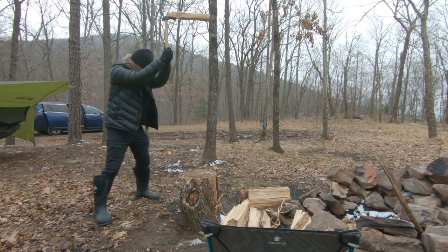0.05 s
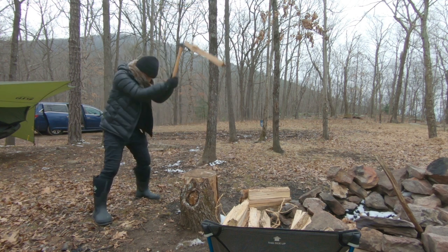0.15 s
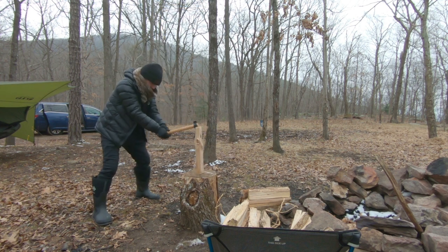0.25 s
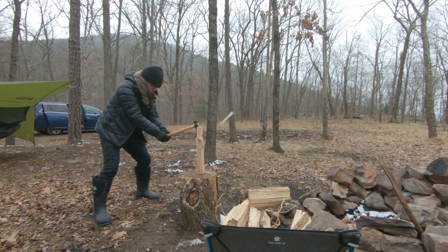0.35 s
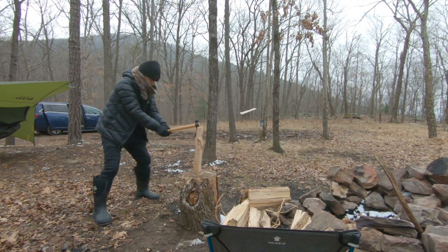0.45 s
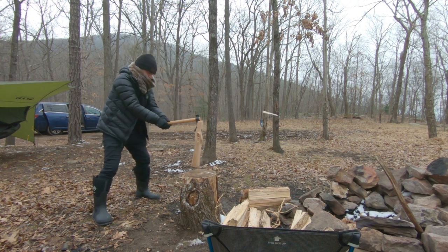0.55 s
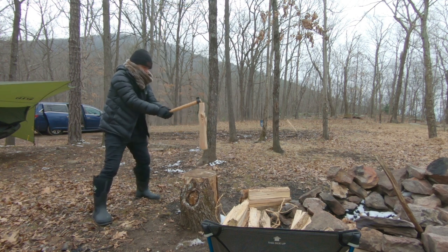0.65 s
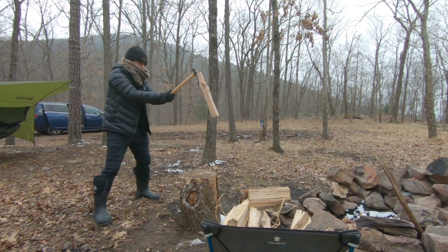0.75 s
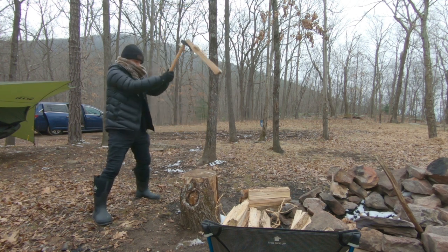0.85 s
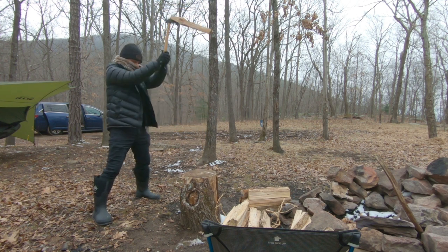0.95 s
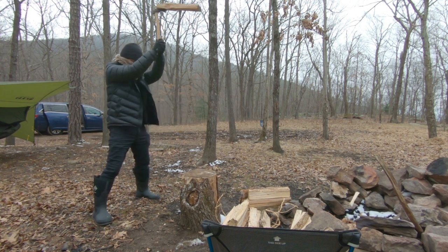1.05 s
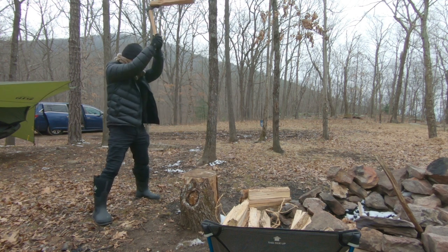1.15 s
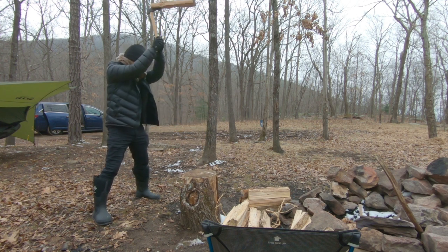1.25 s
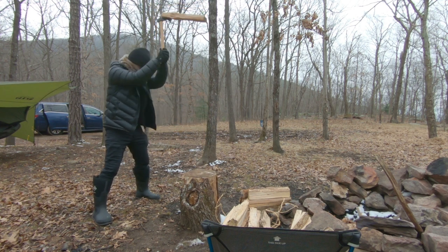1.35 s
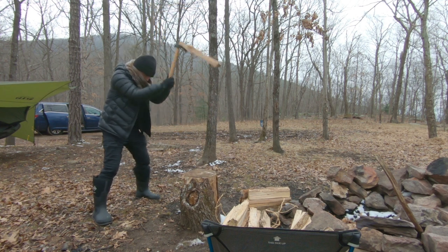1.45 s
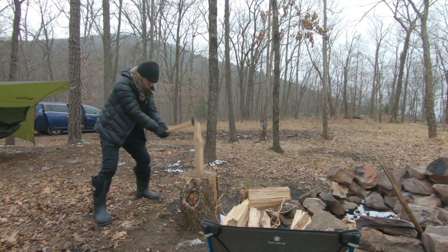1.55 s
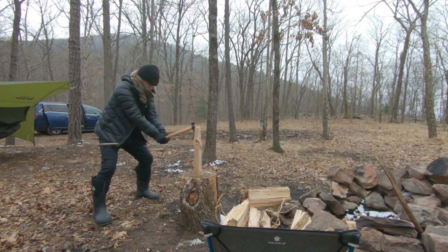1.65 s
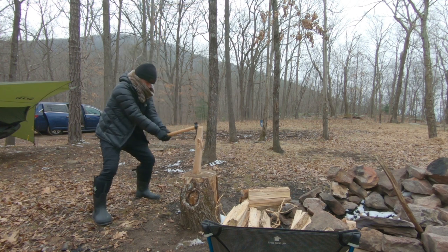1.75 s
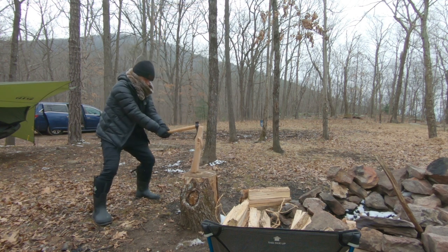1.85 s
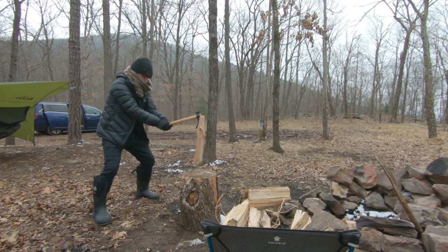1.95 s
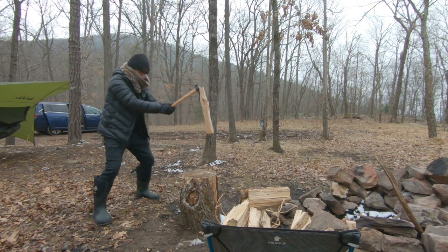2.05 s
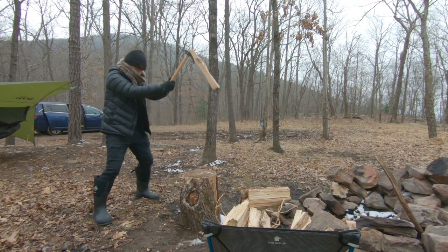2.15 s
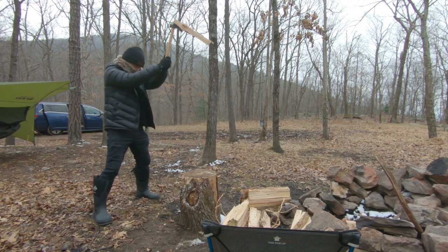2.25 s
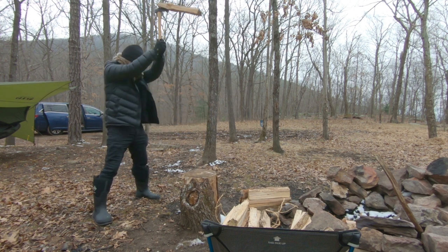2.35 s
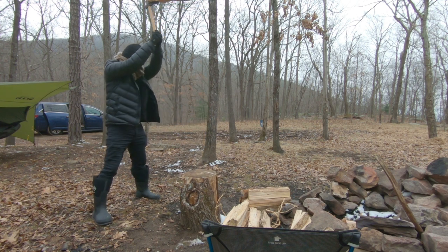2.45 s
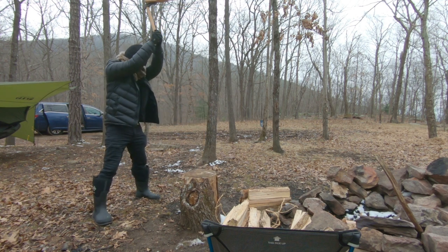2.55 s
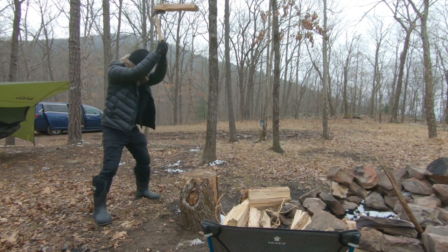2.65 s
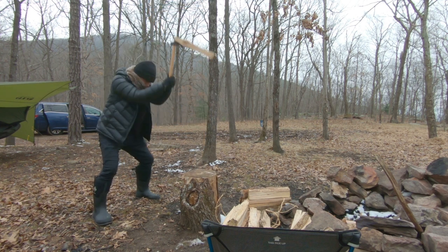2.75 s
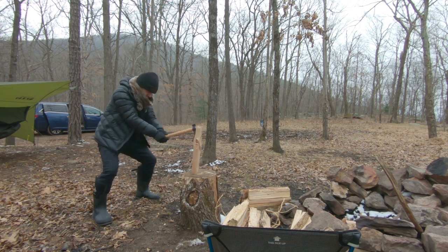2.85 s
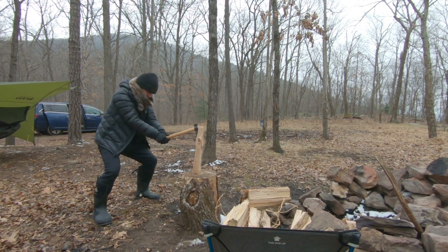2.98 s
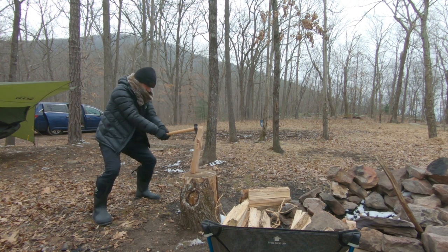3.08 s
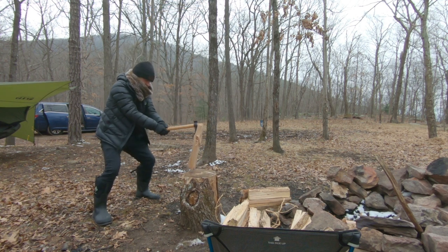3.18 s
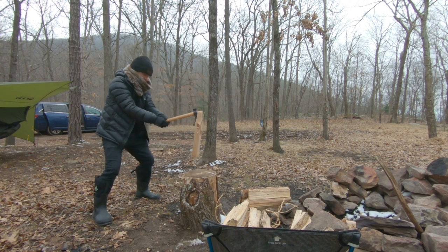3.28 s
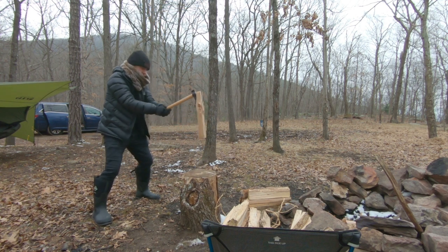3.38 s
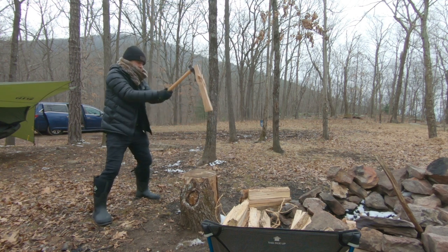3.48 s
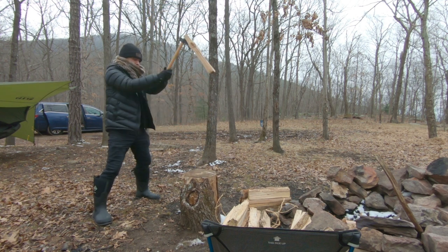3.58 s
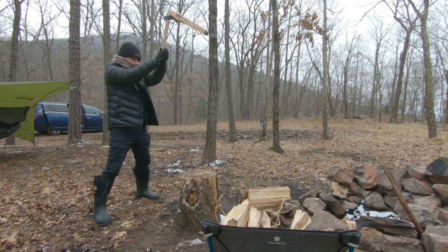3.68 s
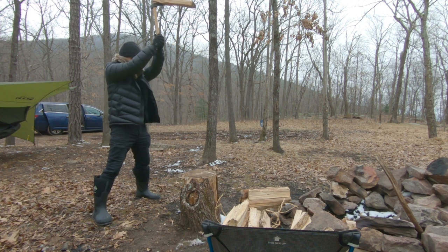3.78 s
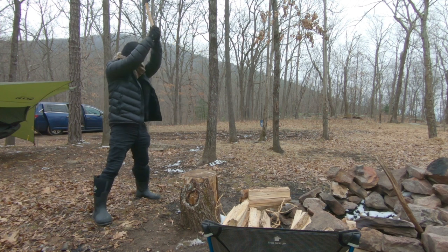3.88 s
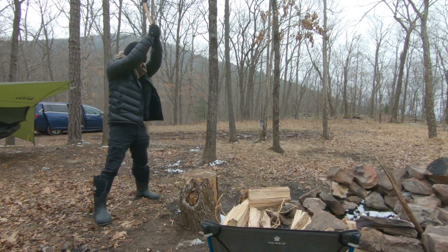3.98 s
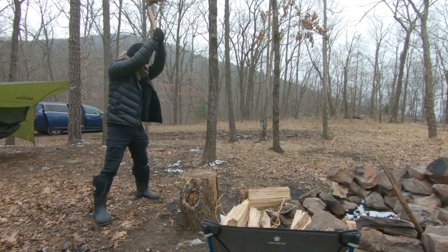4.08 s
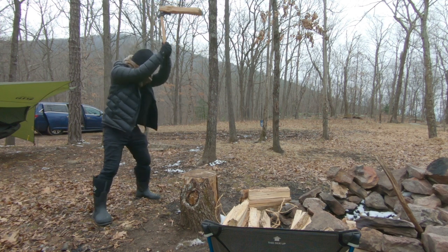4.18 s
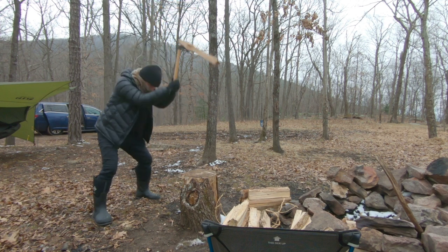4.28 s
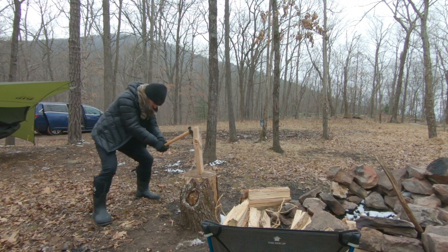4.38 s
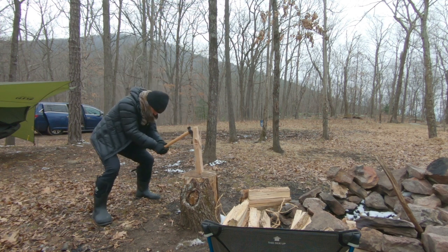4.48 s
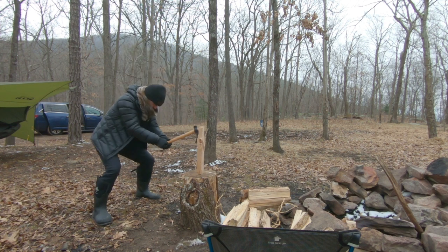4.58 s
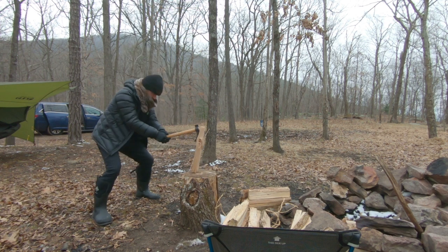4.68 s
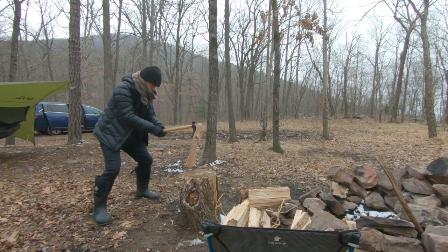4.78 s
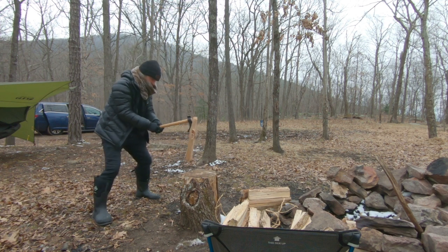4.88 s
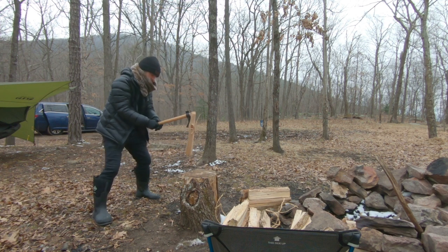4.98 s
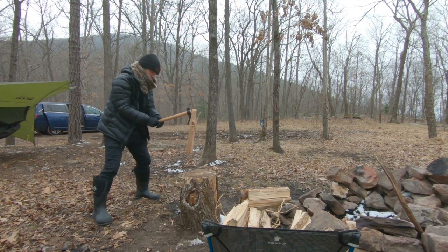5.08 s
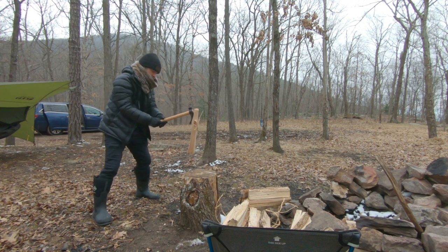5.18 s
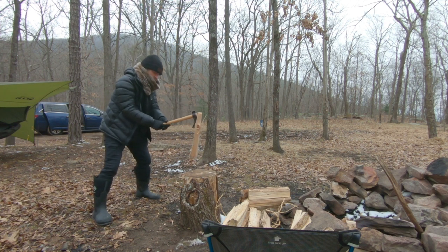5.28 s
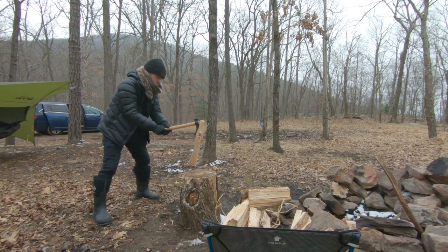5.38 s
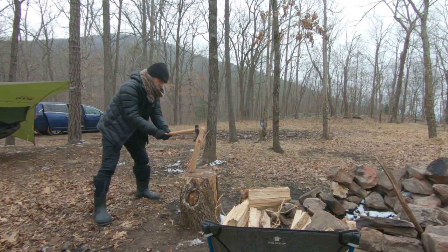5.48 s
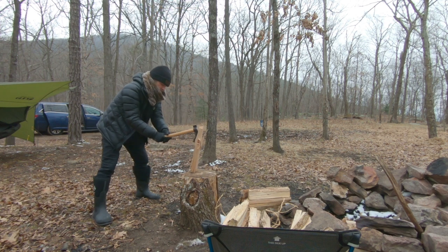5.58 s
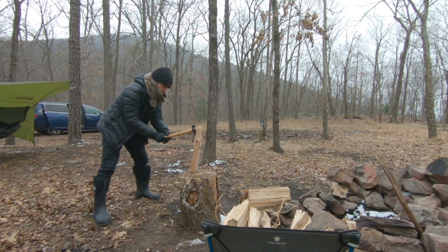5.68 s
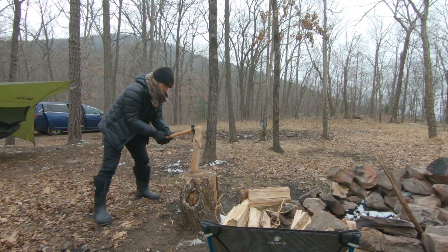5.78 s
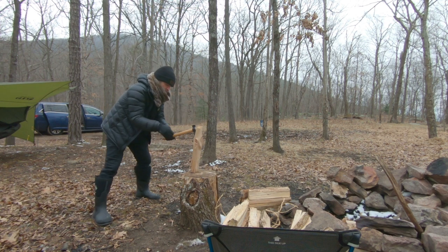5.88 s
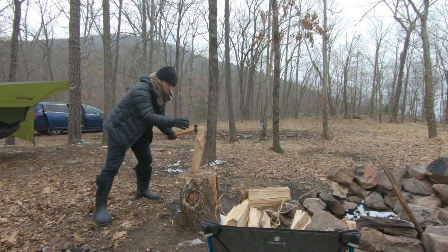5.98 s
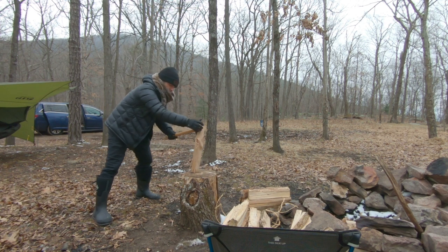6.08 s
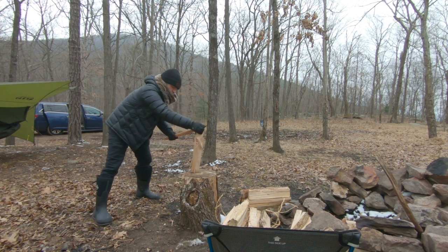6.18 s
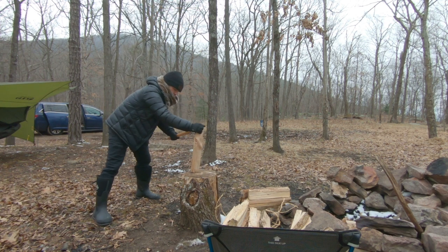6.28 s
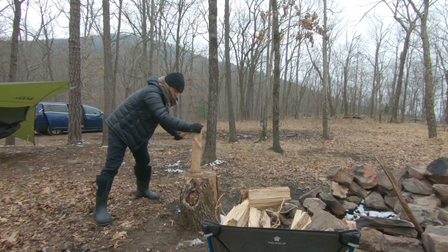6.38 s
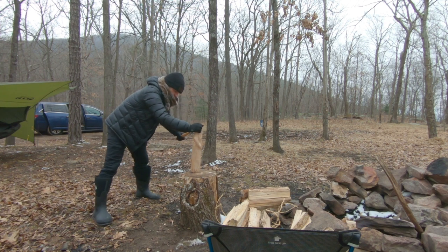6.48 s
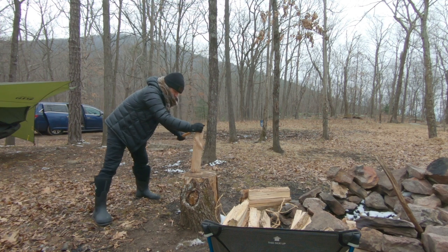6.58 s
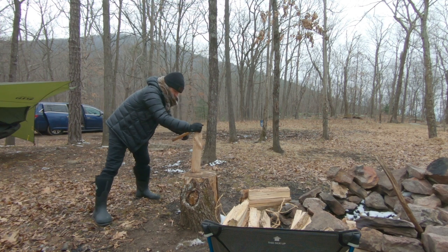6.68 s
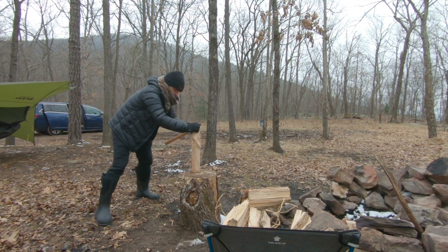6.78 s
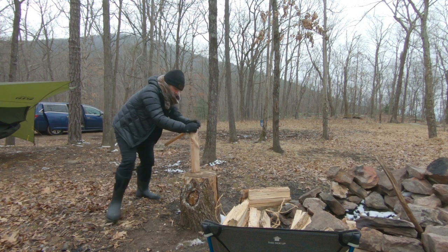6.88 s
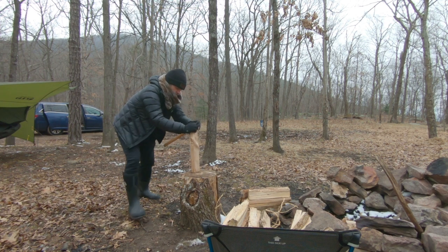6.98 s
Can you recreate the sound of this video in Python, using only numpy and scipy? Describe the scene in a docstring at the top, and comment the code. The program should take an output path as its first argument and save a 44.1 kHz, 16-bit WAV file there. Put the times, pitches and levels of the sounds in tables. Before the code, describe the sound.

Four hard hatchet chops into firewood on a stump, each cracking sharply and echoing through bare woods, with jacket swishes and a small stick clinking.

```python
"""A hatchet wedged in a billet is swung down on a stump four times, in bare winter woods.
Each blow is a bank of decaying modes with torn-fibre noise, a stump thump and a noise echo from the trees;
two faint humming ticks are heard just before it. A padded jacket rubs, with soft high swishes between and
just after the blows (grainy noise with fine ticks), and the billet rushes through the air.
A split-off stick clinks on stones in ringing modes; then the billet is set down with a knock and handled,
among snaps and soft thuds of shaped noise. A faint hush of coloured noise lies under it all."""
import sys
import numpy as np
from scipy import signal
from scipy.fft import rfft, irfft, next_fast_len
from scipy.io import wavfile
from scipy.ndimage import map_coordinates

SR = 44100
rng = np.random.default_rng(int(sys.argv[2]) if len(sys.argv) > 2 else 0)


def wav_record(signal):
    """Record a signal, one row per channel, as 16-bit PCM in the file named by sys.argv[1]."""
    frames = np.transpose(np.atleast_2d(signal))
    bounded = np.clip(frames, -1, 1)
    # unit amplitude maps onto the largest positive 16-bit level
    quanta = np.round(bounded * 32767).astype(np.int16)
    wavfile.write(sys.argv[1], SR, quanta)


N = 310464
TIME = np.arange(N) / SR
SHORT = TIME[:SR // 2]  # time axis of one struck sound, s


def amp(db):
    """Decibels to gain."""
    return 10 ** (np.asarray(db) / 20)


def unit(x):
    """Scaled to rms 1."""
    return x / np.sqrt(np.mean(x ** 2) + 1e-20)


def along(points, hz):
    """(f/Hz, value) points read on a log frequency axis."""
    f, v = np.transpose(points)
    return np.interp(np.log(hz + 1), np.log(f + 1), v)


def pan(db):
    """Left and right gains for a level difference; positive leans left."""
    return amp(np.array([[db], [-db]]) / 2)


def add(track, s, sound):
    """Mix a sound into a track at time s."""
    part = track[:, round(s * SR):][:, :sound.shape[-1]]
    part += sound[..., :part.shape[-1]]


def wobble(rate):
    """A smooth random curve, rate knots a second."""
    knots = rng.standard_normal(int(N * rate / SR) + 4)
    return map_coordinates(knots, [TIME * rate])


def filtered(x, response):
    """x times a response of frequency."""
    n = x.shape[-1]
    m = next_fast_len(n + 8192)
    spectrum = rfft(x, m) * response(np.fft.rfftfreq(m, 1 / SR))
    return irfft(spectrum, m)[..., :n]


def spread(pair, spectrum, alike):
    """Two unrelated signals become a coloured, partly alike stereo pair of rms 1."""
    def mid_side_gains(hz):
        turn = np.arccos(np.clip(along(alike, hz), -1, 1)) / 2
        return amp(along(spectrum, hz)) * [np.cos(turn), np.sin(turn)]

    mid, side = filtered(pair, mid_side_gains)
    return unit(np.array([mid + side, mid - side]))


def burst(spectrum, t60, alike=0.98):
    """A puff of coloured noise that starts at once and dies away exponentially."""
    noise = rng.standard_normal((2, len(SHORT)))
    return spread(noise, spectrum, [(1000, alike)]) * amp(-60 * SHORT / t60)


def ring(modes, scatter_db, colour=((1000, 0),)):
    """Struck modes, at new strengths for each blow; neighbours swing in opposite directions."""
    hz, db, t60 = np.transpose(modes)[:, :, None]
    strength_db = db + along(colour, hz) + scatter_db * rng.standard_normal(hz.shape)
    sign = (-1) ** np.arange(len(hz))[:, None]
    decay = amp(strength_db - 60 * SHORT / t60)
    return np.sum(sign * decay * np.sin(2 * np.pi * hz * SHORT), axis=0)


# spectrum of the hush: [f/Hz, relative level/dB]
AIR_SPECTRUM = [(25, 5.5), (80, -5), (200, 4), (450, -7.5), (850, 6), (1700, 1), (3500, -6), (7500, -14),
                (10000, -28), (15000, -39)]


def air():
    """The faint hush of the woods: coloured noise whose level wavers a little."""
    hush = spread(rng.standard_normal((2, N)), AIR_SPECTRUM, [(100, 0.83), (1000, 0.16), (6000, .1)])
    return amp(-64.5 + 1.7 * wobble(8.4)) * pan(-1.5) * hush


def slides(rows, rise_share=0.93, fall_share=1.3, roundness=1.2):
    """Summed power of swishes and rubs: each swells, then falls a little more gently."""
    # rise and fall are shares of the half length; roundness 1 = pointed top, 2 = bell
    def swell(late):
        return np.exp(-np.maximum(-late / rise_share, late / fall_share) ** roundness)

    return sum((amp(db) * swell((TIME - s) / half)) ** 2 for s, db, half in rows)


def rustle(power, spectrum, alike, grain_db, flutter_db, crease_db, creases_per_s=120):
    """Cloth sliding on cloth: dense tiny slips that come in clumps, and the ticks of flipping creases."""
    slips = rng.standard_normal((2, N)) * amp(grain_db * wobble(700))
    creases = rng.laplace(size=(2, N)) * (rng.random(N) < creases_per_s / SR)
    cloth = spread(slips + amp(crease_db) * unit(creases), spectrum, alike)
    return cloth * np.sqrt(power) * amp(flutter_db * wobble(45))


# steady rubbing of the jacket as the body moves: [t/s, relative level/dB]
BODY_MOTION = [(0, -76.5), (.13, -78.5), (.5, -66.5), (.9, -96.5), (1.25, -85), (1.5, -70), (2.45, -68.5),
               (2.68, -74), (3.2, -70), (4.72, -68), (4.95, -75.5), (5.4, -76), (5.75, -85), (7.04, -82.5)]
# soft high swishes between and just after the blows:
# [t/s of the peak, relative level/dB, nominal half length/s]
SOFT_SWISHES = [(.31, -63, 0.075), (.43, -61, .05), (1.325, -65.5, 0.024), (1.455, -60, .04),
                (1.6, -62, 0.11), (1.9, -60, 0.042), (2.08, -66.5, 0.042), (2.26, -63, 0.12),
                (2.415, -60.5, 0.051), (2.52, -62, 0.033), (2.9, -58, .07), (3.41, -70.5, .06),
                (3.73, -64, 0.097), (3.925, -59.5, 0.033), (4.075, -63, 0.023), (4.255, -59, 0.054),
                (4.36, -56.5, 0.046)]
# steady rubbing as the hands stay busy on the standing billet: [t/s, relative level/dB]
BUSY_HANDS = [(5.78, -95.5), (5.85, -68), (6.35, -71), (7.04, -63.5)]
# a cuff rubs as the hands work: [t/s of fastest slide, relative level/dB, nominal half length/s]
CUFF_RUBS = [(5.415, -55, 0.023), (5.52, -60.5, 0.096), (5.625, -57, 0.038), (5.828, -55, 0.023),
             (6.04, -53, 0.043), (6.098, -49, 0.016), (6.25, -57, 0.066), (6.39, -59.5, 0.022),
             (6.455, -48, 0.026), (6.512, -50.5, 0.011), (6.672, -51.5, 0.027), (6.9, -52, 0.064)]
# spectra of body rubbing with swishes, and of the cuff: [f/Hz, relative level/dB]
SWISH_SPECTRUM = [(30, -9), (130, -8.5), (290, -2), (480, -3), (850, 3), (1500, 2), (4000, -3.5),
                  (8000, -2), (9200, -11.5), (11000, -15.5), (15500, -34.5)]
CUFF_SPECTRUM = [(30, -16.5), (130, -13.5), (280, -6), (480, -11), (1000, -5), (2000, 0), (4000, -1.5),
                 (7800, -2.5), (9200, -13.5), (11000, -21), (15500, -40.5)]
# stereo spread of the same two: [f/Hz, left-right likeness]
SWISH_LIKENESS = [(100, 0.16), (290, 1), (1400, .35), (7000, 0.16), (15000, 0.1)]
CUFF_LIKENESS = [(60, 0.51), (180, 0.74), (550, 0.27), (1650, 0.97), (4970, 0.81), (15000, 0.18)]


def jacket(lag=.00025):
    """Padded nylon rubs as the body moves, amid soft high swishes, and rustles as the hands work the billet."""
    def steady(curve):
        return amp(np.interp(TIME, *np.transpose(curve))) ** 2

    left, right = rustle(steady(BODY_MOTION) + slides(SOFT_SWISHES), SWISH_SPECTRUM, SWISH_LIKENESS,
                         grain_db=1.5, flutter_db=2.1, crease_db=-15.5)
    # the right microphone hears it first
    rubbing = np.array([np.roll(left, round(lag * SR)), right])
    handling = rustle(steady(BUSY_HANDS) + slides(CUFF_RUBS), CUFF_SPECTRUM, CUFF_LIKENESS,
                      grain_db=2.0, flutter_db=2.0, crease_db=-11.5)
    return amp(9.0) * pan(-7.0) * rubbing + amp(3.0) * pan(-1.5) * handling


# the billet rushes through the air: [t/s of the peak, level/dB, half length/s]
AIR_RUSHES = [(0.345, -52.5, 0.024), (1.464, -54, 0.045), (1.654, -58, .03), (2.909, -64, 0.027),
              (3.915, -62, 0.016), (4.425, -83.5, 0.098)]
# spectrum of the rushing air: [f/Hz, relative level/dB]
RUSH_SPECTRUM = [(40, -10), (200, -15), (450, -7), (850, 4), (1300, -5.5), (2500, -9), (8000, -30.5)]


def whooshes():
    """Air rushes round the moving billet: coloured noise in bell-shaped swells."""
    speed = sum(amp(db) * np.exp(-((TIME - s) / width) ** 2) for s, db, width in AIR_RUSHES)
    noise = rng.standard_normal((2, N))
    return pan(-2) * speed * spread(noise, RUSH_SPECTRUM, [(1000, 0.71)])


# modes of the stump on soft ground: [f/Hz, relative level/dB, t60/s]
STUMP_MODES = [(51.6, -7.5, 0.23), (72, -3.5, 0.16), (101.5, -7, 0.075), (175, -17.5, 0.15),
               (219, -26, 0.1), (326, -19, 0.065)]
# spectrum of the shuddering soil: [f/Hz, relative level/dB]
SOIL_SPECTRUM = [(30, -13), (90, -3), (200, -3), (330, -12), (520, -23.5), (1500, -57)]


def thump(lag=.0059, rise=.0015, soil_db=-24, soil_t60=0.36):
    """The heavy stump sinks and bounces a moment after it is hit; the soil shudders under it."""
    soil = amp(soil_db) * burst(SOIL_SPECTRUM, t60=soil_t60, alike=0.93)
    bounce = soil - amp(-1.0) * ring(STUMP_MODES, scatter_db=1.5)
    return np.pad(bounce * (1 - np.exp(-SHORT / rise)), ((0, 0), (round(lag * SR), 0)))


# the blows: [t/s, crack level/dB, colour/dB at 760, 1080, 1800, 2800 and 5500 Hz,
#             level/dB of the humming ticks heard before, thump level/dB, echo level/dB]
BLOWS = [(0.3883, 1.9, 7, -0.5, -0.97, -2.5, 6.5, -27, -13, -42),
         (1.6966, 3.2, -6, 1.5, -0.9, -1.5, 1.5, -30.5, -12, -42),
         (2.9853, 1.0, -4.5, -7, 2.6, 4, 4, -24.5, -18, -39.5),
         (4.5162, 0.5, 6, 2, 1.2, 4.5, -1, -27, -11, -41)]
# where each blow's colour is set, the lowest staying at 0 dB: [f/Hz]
BLOW_COLOUR_HZ = [400, 760, 1080, 1800, 2800, 5500]
# modes of the billet with the steel in it: [f/Hz, relative level/dB, t60/s]
BILLET_MODES = [(224, -23, 0.051), (400, -21.5, 0.035), (760, -19.5, 0.012), (1087, -9.5, 0.013),
                (1596, -0.5, 0.0041), (2200, -2, 0.0049), (2740, -2, 0.0049), (3840, -4.5, 0.0023),
                (4920, -15, 0.0046), (5750, -8, 0.0015), (7440, -15.5, 0.0025), (8800, -16, 0.0014)]
# spectrum of the tearing fibres: [f/Hz, relative level/dB]
TEAR_SPECTRUM = [(100, -18.5), (600, -3), (1100, -3.5), (3000, -5.5), (5000, -2.5), (9000, -20.5),
                 (16000, -37.5)]
# spectra of the longer and the shorter part of a humming tick: [f/Hz, relative level/dB]
FAINT_HUM_SPECTRUM = [(60, -13.5), (400, -12.5), (650, -10.5), (950, 1.5), (1150, -6.5), (1400, -21),
                      (3000, -33.5), (12000, -59.5)]
FAINT_TICK_SPECTRUM = [(300, -9), (1500, 0.5), (3400, 0.5), (4300, -9), (5200, -18.5), (12000, -39.5)]


def humming_tick():
    """A faint humming tick: a narrow-band puff of noise with a shorter, broader one on top."""
    return burst(FAINT_HUM_SPECTRUM, t60=0.069) + burst(FAINT_TICK_SPECTRUM, t60=0.02)


def chops(tick_gap=.0106, ground=0.36, ground_delay=.00108, first_tick_db=-13.5):
    """The billet's crack with tearing fibres, then the stump; two faint humming ticks are heard before it."""
    out = np.zeros((2, N))
    for s, db, *colour_db, tick_db, thump_db, _ in BLOWS:
        colour = list(zip(BLOW_COLOUR_HZ, [0, *colour_db]))
        crack = amp(db) * ring(BILLET_MODES, scatter_db=0.65, colour=colour)
        # the ground returns the crack a millisecond later, which makes it hollow
        crack = crack + ground * np.interp(SHORT - ground_delay, SHORT, crack, left=0)
        fibres = amp(-16) * burst(TEAR_SPECTRUM, t60=.019, alike=.5)
        add(out, s, pan(-1.2) * (crack + fibres))
        add(out, s - tick_gap, amp(tick_db) * humming_tick())
        add(out, s - 2 * tick_gap, amp(tick_db + first_tick_db) * humming_tick())
        add(out, s, amp(thump_db) * thump())
    return out


# the woods answer each blow: [t/s of the swell's top after it, low colour/dB, high colour/dB,
#                             near trunks level/dB]
WOODS_ANSWERS = [(.18, 2.5, 4.5, 0), (0.165, 2, -1.5, 2.5), (0.22, -4.5, -5, -6), (0.18, 0.5, 0, 0)]
# spectrum of the scattered echo: [f/Hz, relative level/dB]
TREES_SPECTRUM = [(40, -20), (150, -11.5), (400, -12.5), (650, -2.5), (1000, 1.5), (2000, 1.5), (3200, -4),
                  (4600, -8.5), (7000, -19), (10000, -38), (15000, -51)]
# stereo spread of the echo: [f/Hz, left-right likeness]
ECHO_LIKENESS = [(100, 0.13), (290, 1), (640, 0.5), (1400, 0.1), (3100, .5), (6800, 0.0061)]
# fading of the tree line's answer: [f/Hz, t60/s]
ECHO_FADE = [(100, 0.5), (500, 1.2), (1200, 1.49), (2500, 1.32), (5000, 0.69), (10000, .7)]


def forest(swell_db=13, near_t60=0.51, far_db=-15, far_t60=2.8):
    """Near trunks scatter each crack at once; the tree line answers in a swell and the hillside lingers."""
    out = np.zeros((2, N))
    for (s, *_, echo_db), (arrival, low_db, high_db, near_db) in zip(BLOWS, WOODS_ANSWERS):
        # trunks stand in clumps, so their reflections arrive unevenly
        clumps = amp(.4 * wobble(35) + 1.1 * wobble(180))[:2 * SR]
        scatter = spread(rng.laplace(size=(2, 2 * SR)) * clumps, TREES_SPECTRUM, ECHO_LIKENESS)
        hz, t, z = signal.stft(scatter, SR, nperseg=256)
        colour = amp(along([(700, low_db), (2000, 0.0024), (6000, high_db)], hz))[:, None]
        fade = along(ECHO_FADE, hz)[:, None]  # the middle of the band lasts longest
        late = np.maximum(t - arrival, 0)  # seconds since the top of the swell
        swell = amp(-swell_db * (2 * np.maximum(1 - t / arrival, 0)) ** 2)
        tree_line = swell * amp(-60 * late / fade)
        # far_t60 holds where the fade is slowest
        hillside = swell * amp(far_db - 60 * late / (far_t60 * fade / fade.max()))
        trunks = amp(near_db - 60 * t / near_t60)
        envelope = np.sqrt(trunks ** 2 + tree_line ** 2 + hillside ** 2)
        echo = signal.istft(z * colour * envelope, SR, nperseg=256)[1]
        add(out, s, amp(echo_db) * pan(-1.6) * echo)
    return out


# the flying stick lands and tumbles: [t/s, ring level/dB, tick level/dB, lower modes' colour/dB]
STICK_CLINKS = [(1.0148, -35, -40, 0), (1.0275, -56, -38.5, 12), (1.0353, -49, -49, 6),
                (1.095, -23, -36, 0), (1.2946, -45.5, -51.5, -12)]
# modes of the loose stick: [f/Hz, relative level/dB, t60/s]
STICK_MODES = [(956, -23.5, 0.14), (2150, -5.5, 0.052), (3016, -5.5, 0.054), (4450, -18, 0.027),
               (7110, -13, 0.018)]
# spectrum of a snap or a contact tick: [f/Hz, relative level/dB]
SNAP_SPECTRUM = [(200, -37), (700, -10), (1200, 4), (2800, 6), (5000, -8), (7500, -5), (9500, -18),
                 (15000, -38.5)]


def stick():
    """The split-off stick rings as it meets the stones on the right; where it is struck sets its colour."""
    out = np.zeros((2, N))
    for s, ring_db, tick_db, low_db in STICK_CLINKS:
        note = ring(STICK_MODES, scatter_db=1.2, colour=[(2200, low_db), (2900, 0)])
        tick = burst(SNAP_SPECTRUM, t60=0.017)
        add(out, s, amp(ring_db) * note + amp(tick_db) * tick)
    return out * pan(-10)


# small snaps of splinters and twigs: [t/s, relative level/dB]
TWIG_SNAPS = [(1.413, -40.5), (2.7615, -38.5), (6.0916, -33.5), (6.387, -38), (6.429, -21.5), (6.4498, -30),
              (6.4955, -36), (6.5199, -34), (6.5565, -35.5), (6.734, -36)]
# the billet is set down on the stump: [t/s, knock level/dB, thump level/dB]
SET_DOWNS = [(5.6138, -32.5, -34.5)]
# modes of its end grain on the stump: [f/Hz, relative level/dB, t60/s]
END_GRAIN_MODES = [(153, -2.5, 0.042), (320, -17.5, 0.2), (580, -4, 0.018), (1390, -14, 0.029),
                   (2450, -3.5, 0.02)]
# spectrum of the dull knock: [f/Hz, relative level/dB]
DULL_SPECTRUM = [(40, -26), (200, -7), (600, 3.5), (1000, -8), (2600, -15), (5000, -24), (14000, -34.5)]
# soft thuds as the billet rocks and a boot lands: [t/s, level/dB]
SOFT_THUDS = [(5.706, -57), (6.975, -49.5), (7.017, -37.5)]
# spectrum of the soft thuds: [f/Hz, relative level/dB]
BOOT_SPECTRUM = [(40, -30), (110, -24.5), (165, 13.5), (240, 1), (340, 1.5), (480, -14), (1500, -16),
                 (9000, -44)]


def small_contacts():
    """Splinters and twigs snap; the billet is set down with a dull knock and rocks; a boot lands softly."""
    out = np.zeros((2, N))
    for s, db in TWIG_SNAPS:
        add(out, s, amp(db - 7) * burst(SNAP_SPECTRUM, t60=0.012))
    for s, knock_db, thump_db in SET_DOWNS:
        knock = ring(END_GRAIN_MODES, scatter_db=0.2) + amp(-8.5) * burst(DULL_SPECTRUM, t60=0.071)
        add(out, s, amp(knock_db) * knock)
        add(out, s, amp(thump_db) * thump())
    for s, db in SOFT_THUDS:
        soft_onset = 1 - np.exp(-SHORT / 0.0074)
        add(out, s, amp(db) * burst(BOOT_SPECTRUM, t60=0.17) * soft_onset)
    return out * pan(-1.2)


def scene():
    """All sources at the two microphones."""
    return air() + jacket() + whooshes() + chops() + forest() + stick() + small_contacts()


def record(dry, top_hz=15900):
    """Peaks beyond full scale clip; a steep low-pass closes the band."""
    clipped = np.clip(dry, -1, 1)
    return filtered(clipped, lambda hz: 1 / (1 + (hz / top_hz) ** 80))


dry = scene()
out = record(dry)
wav_record(out)
```